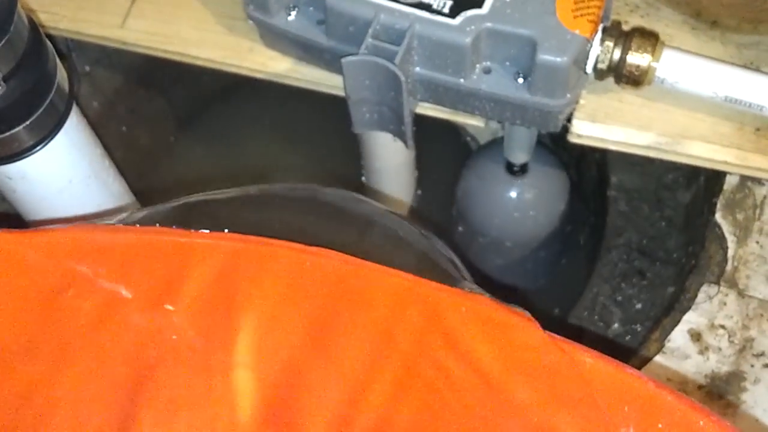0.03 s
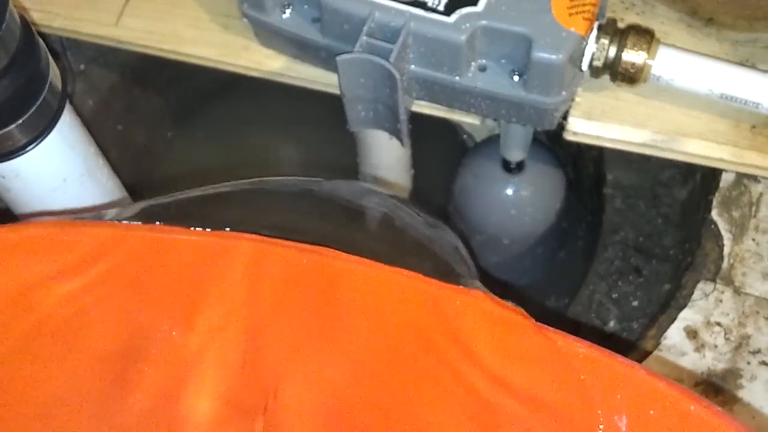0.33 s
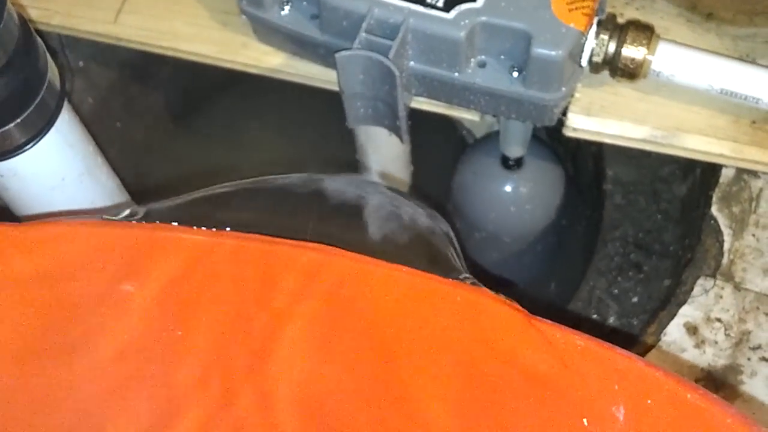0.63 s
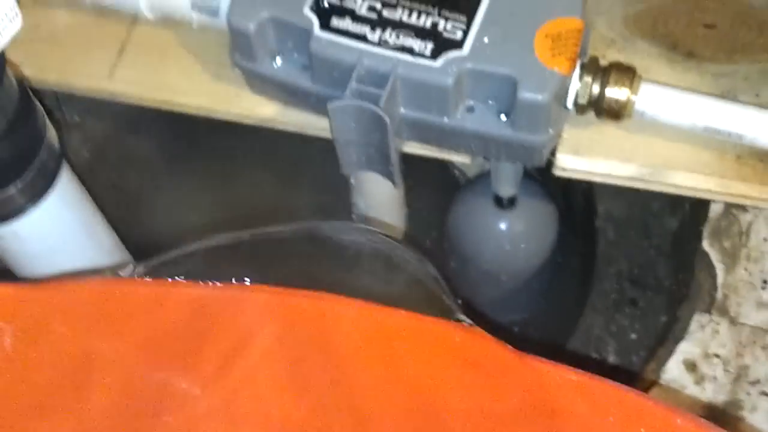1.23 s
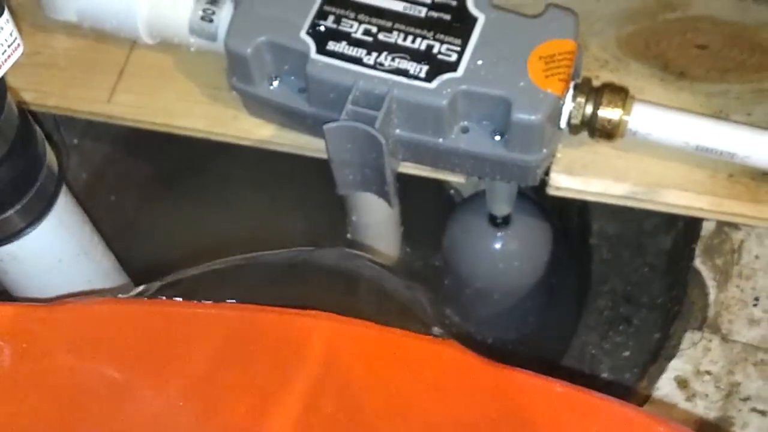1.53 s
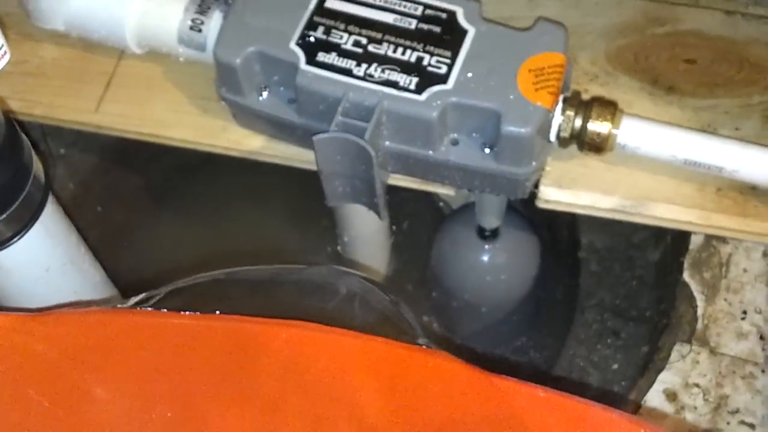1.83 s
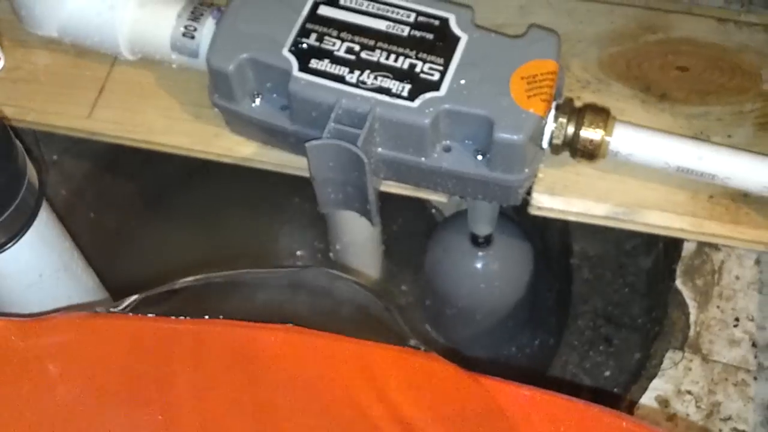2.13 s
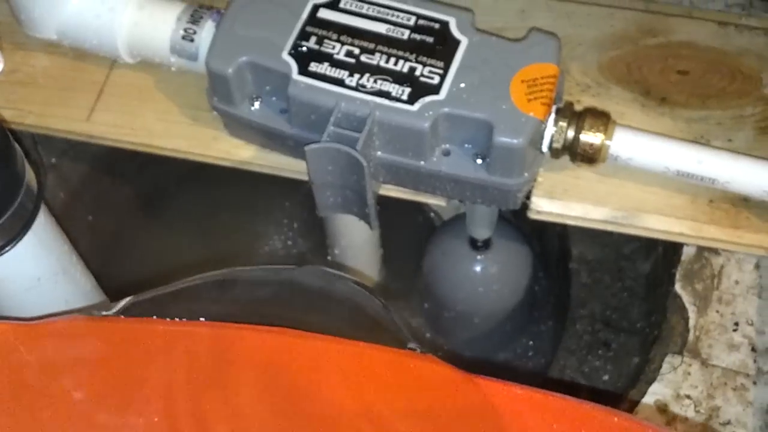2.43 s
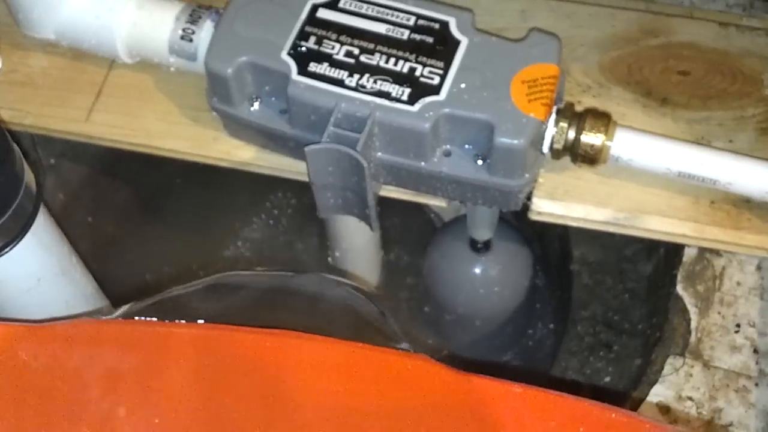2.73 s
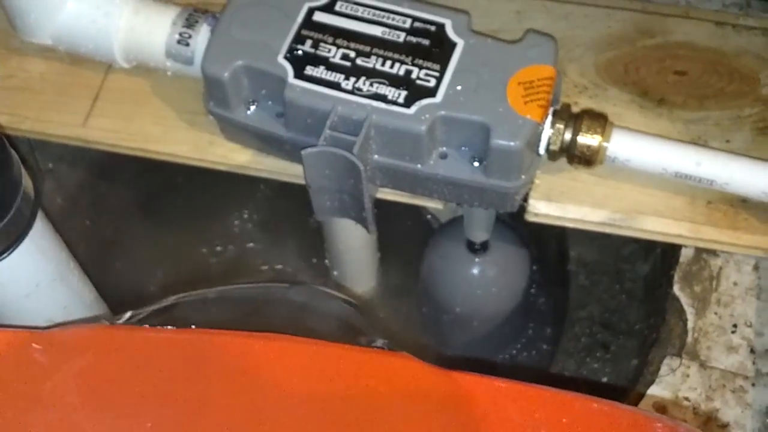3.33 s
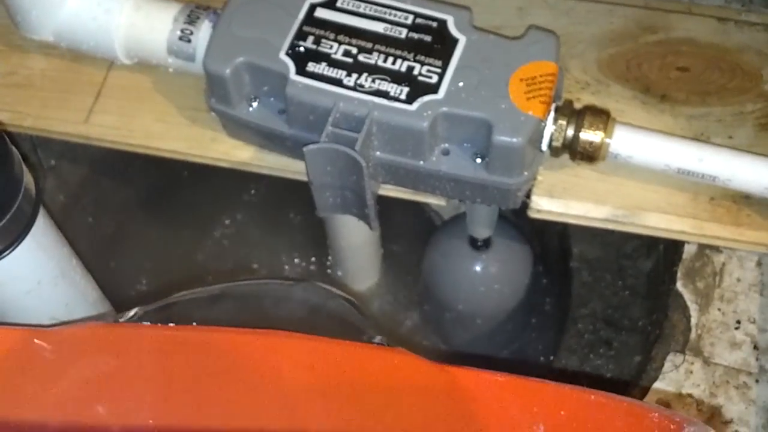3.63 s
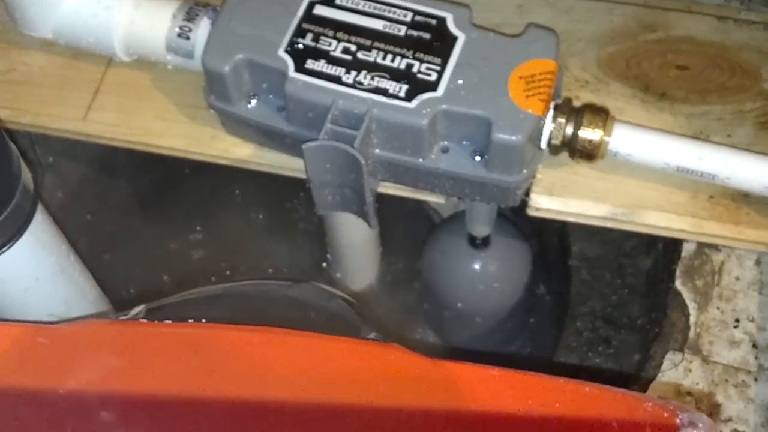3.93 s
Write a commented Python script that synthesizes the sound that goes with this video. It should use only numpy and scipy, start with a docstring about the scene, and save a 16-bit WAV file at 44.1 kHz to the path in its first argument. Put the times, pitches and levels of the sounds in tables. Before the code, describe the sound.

Water rushes, sputters and gurgles through a pump over a booming basement pit.

```python
"""A water-powered pump running over a basement sump pit, miked from close above.
Its jet rushes and sputters, ringing the pipe, and pockets of air gulp through the discharge.
Below, the air of the pit booms and falling water slaps; spray hisses and there is one sharp click.
A faint hum and two dull thumps lie in the background.
Two spaced microphone ports feed a stereo widener."""
import sys
import numpy as np
from scipy import signal
from scipy.fft import rfft, irfft
from scipy.io import wavfile
from scipy.ndimage import uniform_filter1d

SR = 44100
rng = np.random.default_rng(int(sys.argv[2]) if len(sys.argv) > 2 else 0)


def persist_wave(psi):
    """Save psi, clipped to +-1, as 16-bit WAV."""
    counts = np.round(np.clip(psi, -1, 1) * 32767).astype(np.int16)
    wavfile.write(sys.argv[1], SR, np.atleast_2d(counts).T)


N = 176400
TIME, HZ = np.arange(N) / SR, np.fft.rfftfreq(N, 1 / SR)

# Levels are relative within each table; the functions set the balance.
# spectra of the pit's boom, the jet, the spray and the click (frequency [Hz], level [dB])
BOOM_SPECTRUM = [(30, -32), (60, -16), (90, 1), (130, -60), (165, -2.5), (190, -13), (235, 3), (285, 3),
                 (330, -0.5), (380, -1), (420, -6)]
RUSH_SPECTRUM = [(440, -15), (510, -4.5), (550, -2), (650, 3), (780, -10), (900, -4.5), (1030, -10.5),
                 (1150, -3.5), (1600, -4), (2000, -3.5), (2450, 1.5), (2600, -5.5), (2750, -11.5)]
HISS_SPECTRUM = [(2750, -11.5), (3000, 2.5), (3600, -2), (4800, -5), (6200, -8.5), (7600, -10.5),
                 (9000, -12), (10300, -14.5), (13000, -15), (15500, -12.5)]
CLICK_SPECTRUM = [(1000, -14), (3000, -6), (5500, -10), (7000, 1), (9500, 3), (12000, -5), (15500, -5)]
# rise and fall of the boom, the jet, the spray and the pipe's ring (time [s], level [dB])
BOOM_ENVELOPE = [(0.0, -46), (0.03, -41), (0.3, -46), (0.32, -38), (0.6, -39.5), (0.67, -47), (1.02, -44.5),
                 (1.08, -38), (1.11, -44), (1.48, -48), (1.58, -52), (1.71, -42.5), (1.86, -49),
                 (1.88, -37), (2.0, -52.5), (2.12, -36), (2.22, -52), (2.25, -40.5), (2.29, -47.5),
                 (2.51, -41.5), (2.58, -46), (2.63, -43), (2.7, -53), (2.75, -38.5), (2.83, -48),
                 (2.86, -38), (3.03, -38), (3.09, -57), (3.3, -47.5), (3.45, -48), (3.52, -45.5),
                 (3.72, -43), (3.83, -49), (3.87, -39), (4.0, -43.5)]
RUSH_ENVELOPE = [(0.0, -29.5), (0.24, -24), (0.37, -27), (0.42, -24.5), (0.71, -29), (0.72, -24.5),
                 (0.77, -37), (0.79, -29.5), (0.96, -26), (0.99, -30), (1.05, -27), (1.1, -30.5),
                 (1.12, -26.5), (1.31, -24.5), (1.35, -32.5), (1.41, -27), (1.43, -34.5), (1.49, -27),
                 (1.53, -32), (1.79, -28), (1.83, -36.5), (1.87, -27.5), (2.18, -29.5), (2.19, -30),
                 (2.25, -25.5), (2.27, -33.5), (2.37, -28), (2.72, -28), (2.75, -23), (2.76, -27.5),
                 (2.97, -30), (3.01, -25), (3.09, -37), (3.2, -37), (3.33, -33), (3.4, -30.5),
                 (3.49, -33.5), (3.52, -30.5), (3.6, -33.5), (3.85, -32), (3.87, -30), (3.89, -33),
                 (3.98, -32), (4.0, -29)]
HISS_ENVELOPE = [(0.0, -34), (0.26, -33), (0.42, -35.5), (0.65, -32), (0.72, -36.5), (0.82, -37),
                 (0.865, -32), (0.9, -34), (1.21, -35.5), (1.245, -31), (1.3, -33.5), (1.59, -39),
                 (1.61, -36), (1.92, -35), (1.94, -32.5), (2.23, -36), (2.44, -32.5), (2.66, -37),
                 (2.77, -33), (2.84, -40.5), (2.88, -34.5), (3.01, -39.5), (3.05, -33), (3.06, -38.5),
                 (3.13, -41), (3.44, -37.5), (3.45, -36.5), (3.49, -37), (3.84, -35), (3.87, -32.5),
                 (3.9, -35.5), (4.0, -37)]
PIPE_ENVELOPE = [(0, -37.5), (0.38, -42), (0.42, -30), (0.47, -35), (1.08, -39), (1.15, -27.5), (1.4, -36),
                 (1.83, -37.5), (1.87, -29), (1.91, -30), (1.94, -27), (2.01, -28.5), (2.12, -33),
                 (2.15, -24), (2.19, -33), (2.35, -24.5), (2.47, -26.5), (2.52, -31), (2.56, -27),
                 (2.74, -26.5), (2.79, -29), (2.97, -30), (3.01, -23), (3.07, -40), (3.12, -40),
                 (3.19, -28.5), (3.3, -31.5), (3.4, -31), (3.49, -34), (3.54, -26), (3.62, -33),
                 (3.69, -27), (3.75, -33), (3.8, -28), (4, -28.5)]
# the pit's low air modes and higher standing waves (frequency [Hz], width [Hz], level [dB])
PIT_AIR_MODES = [(166, 16, -11), (211, 16, 0), (259, 20, -4), (292, 24, -13), (352, 30, -22)]
PIT_STANDING_WAVES = [(470, 25, -8), (563, 43, 5), (882, 30, 4), (962, 36, 1), (1114, 28, 7), (1254, 24, 6),
                      (1432, 26, 3), (1836, 28, 3), (1985, 36, 1), (2196, 28, 4), (2515, 50, 4)]
# resonances of the discharge pipe (frequency [Hz], level [dB])
PIPE_MODES = [(1335, -3), (1421, -5), (1550, 1), (1631, 3), (1685, 0), (1789, -3), (1916, -7), (2401, -8)]
# swells of the background hum (time [s], length [s], level [dB], pitch [Hz])
HUM_SWELLS = [(0.42, 0.63, -53, 87.5), (1.19, 0.42, -49.5, 99)]
# air pockets in the discharge (time [s], level [dB], pitch [Hz])
AIR_GULPS = [(0.062, -25, 870), (0.065, -28, 535), (0.218, -25, 1030), (0.237, -26, 570), (0.288, -24, 674),
             (0.443, -26.5, 670), (0.543, -30, 980), (0.584, -26.5, 526), (0.725, -37, 510),
             (0.791, -22.5, 616), (0.853, -42, 659), (0.998, -27, 553), (1.07, -32, 280),
             (1.242, -31, 1170), (1.297, -29, 268), (1.305, -27, 595), (1.709, -23.5, 615),
             (1.712, -26, 278), (1.772, -34.5, 637), (1.806, -33, 960), (1.883, -26, 570),
             (2.097, -30, 465), (2.238, -30, 665), (2.427, -30, 545), (2.555, -27, 600), (2.568, -30, 945),
             (2.689, -27, 585), (2.722, -31, 580), (2.74, -23, 904), (2.918, -26.5, 586),
             (2.967, -27.5, 565), (3.015, -26, 580), (3.266, -26.5, 632), (3.364, -30, 586),
             (3.384, -27, 920), (3.435, -41, 660), (3.647, -17, 600), (3.766, -31, 620)]
# dull thumps, slaps of falling water, spits of spray, spurts of the jet (time [s], level [dB])
LOW_THUMPS = [(1.095, -35), (2.96, -42)]
WATER_SLAPS = [(0.225, -26), (0.53, -30), (0.85, -29), (0.91, -30), (1.708, -32), (2.24, -30), (2.44, -29),
               (2.555, -33), (2.675, -30), (3.265, -35), (3.434, -34)]
SPRAY_SPITS = [(0.5056, -30), (1.417, -30.5), (2.0541, -30), (2.6298, -31), (3.4779, -31.5), (3.929, -29.5)]
JET_SPURTS = [(0.41, -12.5), (0.851, -13), (0.9118, -29), (0.9547, -9), (1.1173, -27), (1.8844, -18),
              (2.1426, -15), (2.4234, -12), (2.4606, -9), (2.549, -6.5), (2.998, -7.5), (3.3827, -13),
              (3.8598, -4.5), (3.908, -22), (3.945, -6.5), (3.9678, -8)]
# the microphone's two ports (frequency [Hz], likeness [0-1], left lead [rad], left minus right [dB])
MIC_PORTS = [(90, 0.83, -0.15, 1.1), (220, 0.98, 0.13, -0.3), (400, 0.67, 0.2, -3), (600, 0.94, 0.2, -1.3),
             (900, 0.79, 1.23, 1.1), (1150, 0.58, 0.72, -0.8), (1650, 0.44, 1.91, -5.8),
             (2100, 0.57, -2.53, -4.2), (2450, 0.35, -1.42, -5), (3400, 0.29, 1.15, -3.5),
             (4800, 0.14, -0.43, 0.8)]


def amp(db):
    """Decibels to gain."""
    return 10 ** (np.asarray(db) / 20)


def unit(x):
    """Scales to rms 1."""
    return x / np.sqrt(np.mean(x ** 2) + 1e-20)


def noise():
    """Two independent streams of white noise."""
    return rng.standard_normal((2, N))


def level(points):
    """Gain over time from rows (time [s], level [dB])."""
    return amp(np.interp(TIME, *np.transpose(points)))


def colour(x, points, skirt_db=60):
    """Filters by rows (frequency [Hz], level [dB]), falling skirt_db an octave outside them; rms 1."""
    hz, db = np.transpose(points)
    octave, known = np.log2(HZ + 1), np.log2(hz)
    outside = abs(octave - np.clip(octave, known.min(), known.max()))
    return unit(irfft(rfft(x) * amp(np.interp(octave, known, db) - skirt_db * outside), N))


def ring(modes):
    """Noise rings steep-sided resonances (frequency [Hz], width [Hz], level [dB]); rms 1."""
    response = sum(amp(db) / (1 + 1j * (HZ - hz) / (0.47 * width)) ** 2 for hz, width, db in modes)
    return unit(irfft(rfft(noise()) * response, N))


def add(mix, start_s, sound):
    """Mixes a sound in at start_s."""
    part = mix[..., round(start_s * SR):][..., :sound.shape[-1]]
    part += sound[..., :part.shape[-1]]


def wobble(rate_hz):
    """Random motion of rms 1, up to about the given rate."""
    return unit(irfft(rfft(rng.standard_normal(N)) * HZ / (HZ + 4) / (1 + (HZ / rate_hz) ** 3), N))


def sputter(per_s, fall_s):
    """Random pushes that start at once and die away, rms 1."""
    kicks = rng.random(N) < per_s / SR
    return unit(irfft(rfft(kicks) * HZ / (HZ + 8) / (1 + 2j * np.pi * HZ * fall_s), N))


def bursts(rows, rise_s, fall_s):
    """Envelope of quick swells from rows (time [s], level [dB])."""
    out, t = np.zeros(N), TIME[:SR // 5]
    shape = np.minimum(t / rise_s, 1) * np.exp(-np.maximum(t - rise_s, 0) / fall_s)
    for start_s, db in rows:
        add(out, start_s, amp(db) * shape)
    return out


def churn(patch_db, frames, bins):
    """Two streams of turbulence: noise with louder and softer patches in time and frequency."""
    spectra = signal.stft(noise(), nperseg=512, noverlap=384)[2]
    patches = uniform_filter1d(rng.standard_normal(spectra.shape[1:]), frames, axis=1)
    patches = unit(uniform_filter1d(patches, bins, axis=0))
    return unit(signal.istft(spectra * amp(patch_db * patches), nperseg=512, noverlap=384)[1][:, :N])


def reflections(x, ripple_db, width_hz, from_hz=1200):
    """Many close reflections leave a fine, steady ripple on the upper spectrum."""
    ripple = unit(uniform_filter1d(rng.standard_normal(len(HZ)), round(width_hz / HZ[1])))
    upper = 1 - 1 / (1 + (HZ / from_hz) ** 4)
    return irfft(rfft(x) * amp(ripple_db * np.tanh(ripple) * upper), N)


def bubble(hz, rise_cycles, glide):
    """A bubble swells to its peak, then rings away, sliding in pitch by glide."""
    age = np.arange(0, 5, hz / rise_cycles / SR)  # in rise times
    turns = rise_cycles * (age + glide * age ** 2 / 2)
    return (age * np.exp(1 - age)) ** 2 * np.sin(2 * np.pi * turns)


def bubbles(low_hz, high_hz, per_s, rise_cycles, spread_db, sizes=24):
    """A swarm of bubbles of random size and moment, in two streams."""
    out = np.zeros((2, N))
    for k, hz in enumerate(np.geomspace(low_hz, high_hz, sizes)):
        onsets = rng.random(N) < per_s / sizes / SR
        strength = amp(spread_db * np.minimum(rng.exponential(1, N), 3))
        out[k % 2] += signal.oaconvolve(onsets * strength, bubble(hz, rise_cycles, glide=0.025))[:N]
    return unit(out)


def hum():
    """In the background a faint low hum swells and fades twice, wavering a little."""
    out, waver = np.zeros((2, N)), wobble(rate_hz=14)
    for start_s, length_s, db, hz in HUM_SWELLS:
        t = TIME[:round(length_s * SR)]
        turns = np.cumsum(hz * (1 + 0.014 * waver[:len(t)])) / SR
        add(out[0], start_s, amp(db) * np.sin(np.pi * t / length_s) * np.sin(2 * np.pi * turns))
    return out


def thumps():
    """Dull low thumps at the left port only."""
    out = np.zeros((2, N))
    for start_s, db in LOW_THUMPS:
        add(out[0], start_s, amp(db) * bubble(hz=119, rise_cycles=0.5, glide=-0.045))
    return out


def pit_boom(surge):
    """Below the microphone, the air of the pit booms with the churning water."""
    wash = colour(churn(patch_db=4, frames=12, bins=3), BOOM_SPECTRUM)
    boom = amp(-5.5) * wash + amp(6) * ring(PIT_AIR_MODES)
    return boom * surge * amp(wobble(rate_hz=33)) * level(BOOM_ENVELOPE)


def slaps():
    """Lumps of water slap down in the pit."""
    wet = colour(noise(), [(520, -4), (750, -6), (1100, -2), (1400, -0.5)], skirt_db=26)
    return wet * bursts(WATER_SLAPS, rise_s=0.006, fall_s=0.0097)


def spray(surge):
    """Fine spray hisses, with tiny bubbles bursting in it, and spits now and then."""
    fizz = bubbles(low_hz=2990, high_hz=15300, per_s=2900, rise_cycles=0.64, spread_db=3)
    mist = reflections(churn(patch_db=1.89, frames=7, bins=26), ripple_db=3.5, width_hz=45)
    hiss = colour(unit(mist) + amp(-21.5) * fizz, HISS_SPECTRUM, skirt_db=94)
    hiss *= surge * amp(0.7 * sputter(per_s=19, fall_s=0.044)) * level(HISS_ENVELOPE)
    spits = colour(noise(), [(4000, 8), (8000, 34), (15000, -9)], skirt_db=15)
    spits *= bursts(SPRAY_SPITS, rise_s=0.001, fall_s=0.012)
    return amp(-1) * hiss + amp(-4) * spits


def click(start_s=3.0508, db=-22.5):
    """One sharp, bright click."""
    bright = colour(noise(), CLICK_SPECTRUM, skirt_db=20)
    return bright * bursts([(start_s, db)], rise_s=0.001, fall_s=0.003)


def gulps(typical_cycles=8.5, glide=0.15):
    """Large air pockets gulp through the discharge: a few cycles that swell, fade and slide in pitch."""
    out = np.zeros((2, N))
    for start_s, db, hz in AIR_GULPS:
        size, slide = rng.uniform(-0.78, 1, 2)
        cycles = typical_cycles * (1 + size / 4)
        progress = np.arange(0, 1, hz / cycles / SR)
        turns = cycles * (progress + glide * slide * progress * (progress - 0.5))
        swell = np.sin(np.pi * progress ** 0.51) ** 2
        add(out[0], start_s, amp(db) * swell * np.sin(2 * np.pi * turns))
    return out


def spurts():
    """Spurts of the jet splash and knock the pipe."""
    knocks = np.zeros((2, N))
    for start_s, db in JET_SPURTS:
        knock = bubble(hz=1640 * rng.uniform(0.85, 1.04), rise_cycles=4.1, glide=0)
        add(knocks[0], start_s, amp(db) * knock)
    splash = colour(noise(), [(900, 11), (1200, 0), (1650, 9), (2400, -1), (5000, -24)])
    splash *= bursts(JET_SPURTS, rise_s=0.0018, fall_s=0.0042)
    return amp(-13.5) * knocks + amp(-20) * splash


def pipe(surge, width_hz=28):
    """Sputtering water and air make the discharge pipe ring and rasp."""
    tones = ring([(hz, width_hz, db) for hz, db in PIPE_MODES])
    rasp = ring([(1660, 170, 0)]) * amp(1.3 * sputter(per_s=57, fall_s=0.008))
    return (amp(-7) * tones + amp(-17.5) * rasp) * surge * level(PIPE_ENVELOPE)


def jet(surge):
    """Close up, the jet rushes and gurgles through the pump and stirs standing waves in the pit."""
    turbulence = reflections(churn(patch_db=2.5, frames=6, bins=8), ripple_db=8, width_hz=63)
    rush = colour(turbulence, RUSH_SPECTRUM, skirt_db=28)
    gurgle = bubbles(low_hz=518, high_hz=678, per_s=67, rise_cycles=1.86, spread_db=0)
    flow = amp(-5.5) * rush + amp(-12) * ring(PIT_STANDING_WAVES) + amp(-18) * gurgle
    return flow * surge ** 0.68 * level(RUSH_ENVELOPE)


def microphone(streams):
    """Two spaced ports above the pit hear the bass alike and the treble differently."""
    hz, *columns = np.transpose(MIC_PORTS)
    likeness, lead, tilt_db = (np.interp(np.log(HZ + 1), np.log(hz), column) for column in columns)
    left, unrelated = rfft(streams)
    right = (likeness * left + np.sqrt(1 - likeness ** 2) * unrelated) * np.exp(-1j * lead)
    return irfft(np.array([left * amp(tilt_db / 2), right * amp(-tilt_db / 2)]), N)


def scene():
    """The pump from close above: one uneven surge of the flow sways the boom, spray, pipe and jet."""
    surge = amp(sputter(per_s=55, fall_s=0.0052) + 0.66 * wobble(rate_hz=11))  # pushes on slower swells
    around = hum() + pit_boom(surge) + slaps() + spray(surge) + click()
    pump = gulps() + spurts() + pipe(surge) + jet(surge)
    return thumps() + microphone(around + pump)


def record(dry, delay_samples=16, cross_gain=0.975, cutoff_hz=15780):
    """The widener subtracts a delayed copy of each channel from the other; a low-pass follows."""
    crossed = np.pad(dry[::-1], ((0, 0), (delay_samples, 0)))[:, :N]
    lowpass = signal.firwin(1023, cutoff_hz, window=("kaiser", 9), fs=SR)
    return signal.oaconvolve(dry - cross_gain * crossed, lowpass[None], "same")


dry = scene()
out = record(dry)
persist_wave(out)
```